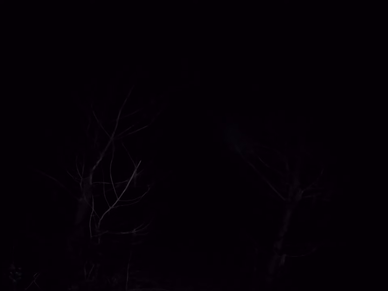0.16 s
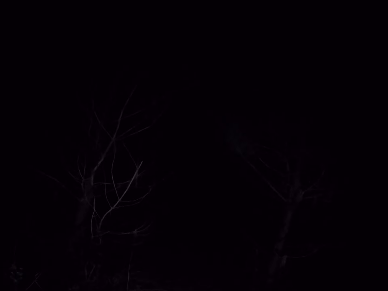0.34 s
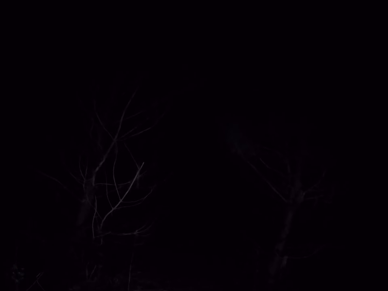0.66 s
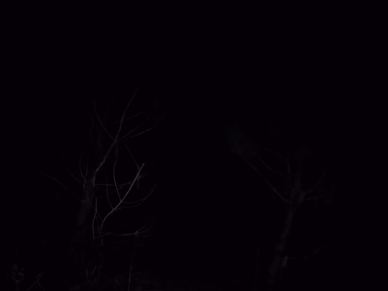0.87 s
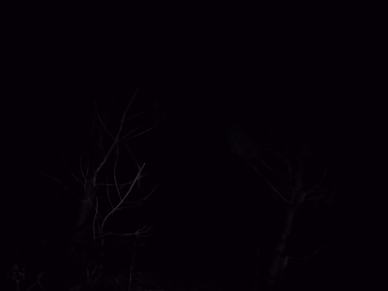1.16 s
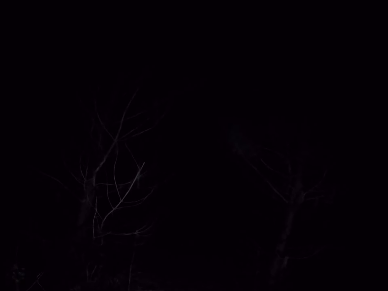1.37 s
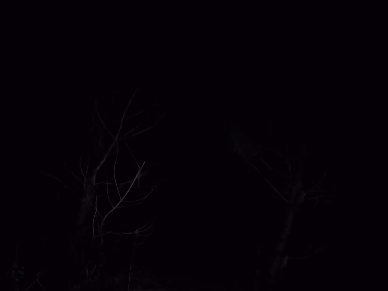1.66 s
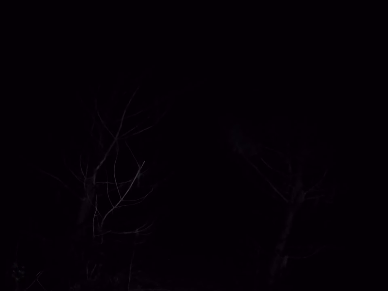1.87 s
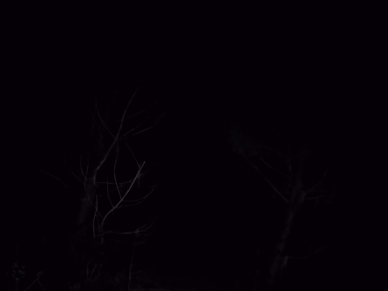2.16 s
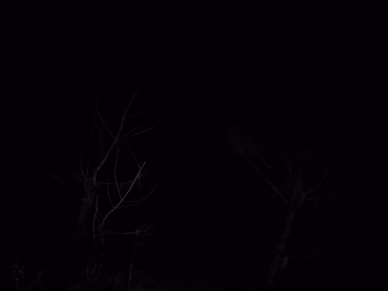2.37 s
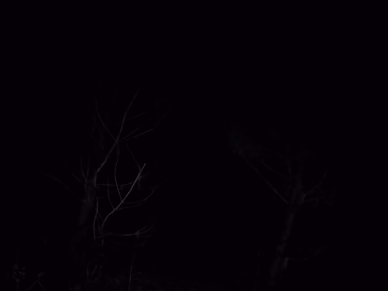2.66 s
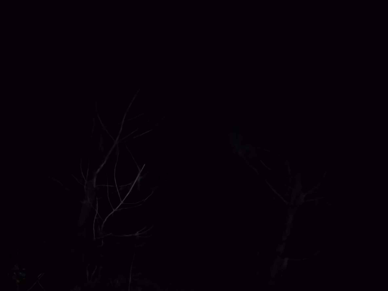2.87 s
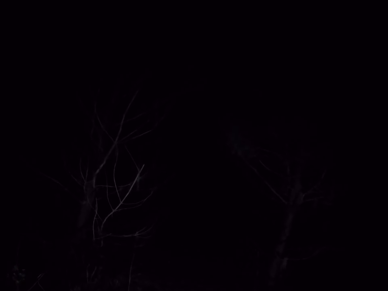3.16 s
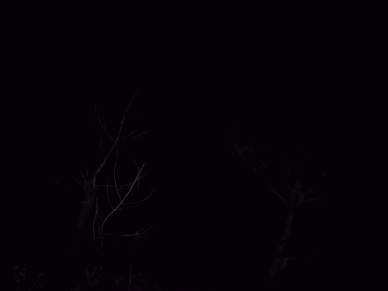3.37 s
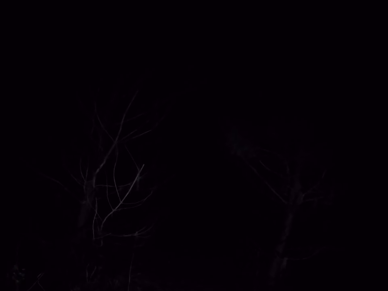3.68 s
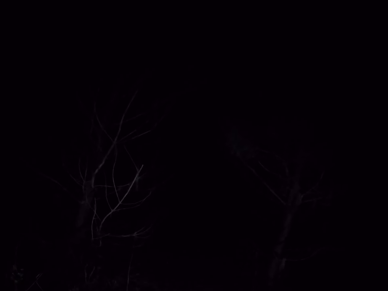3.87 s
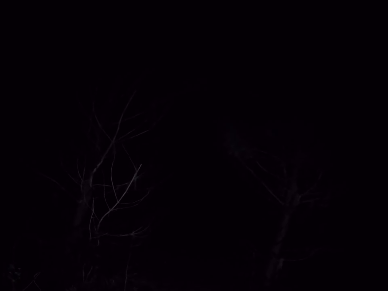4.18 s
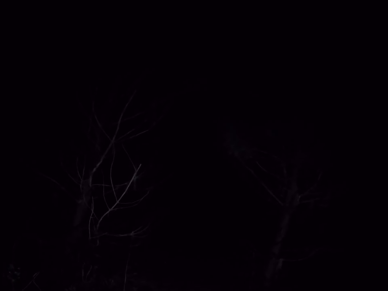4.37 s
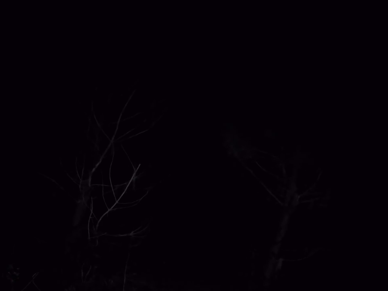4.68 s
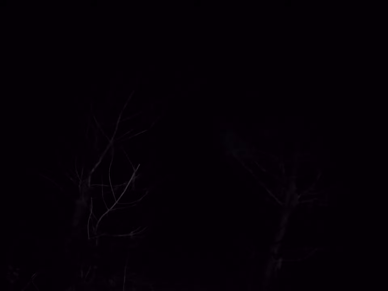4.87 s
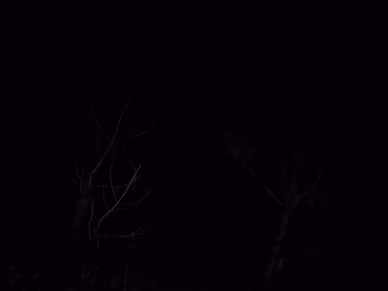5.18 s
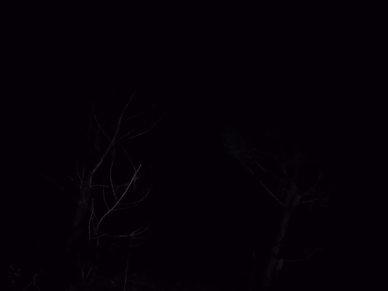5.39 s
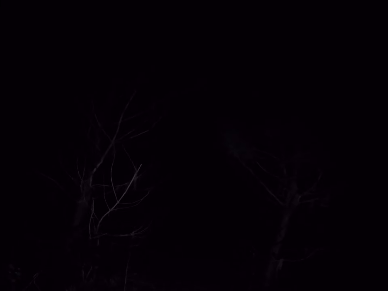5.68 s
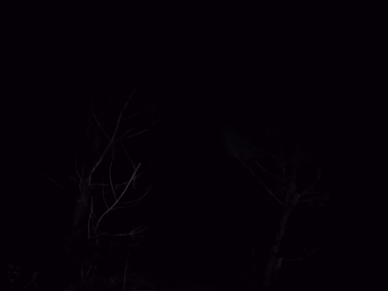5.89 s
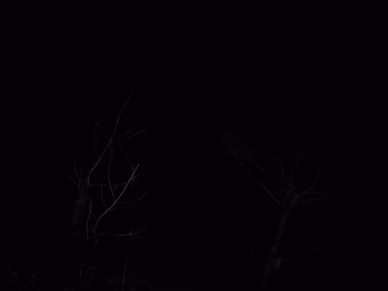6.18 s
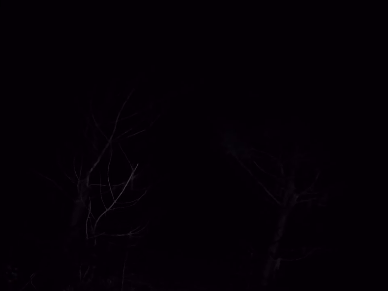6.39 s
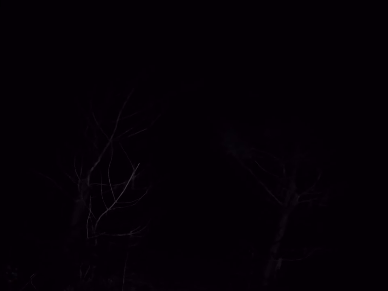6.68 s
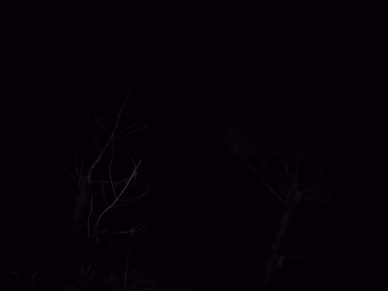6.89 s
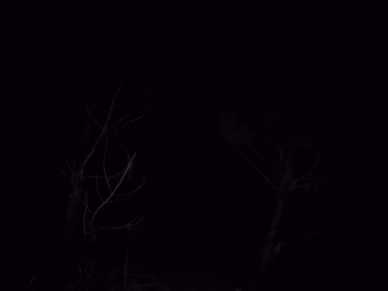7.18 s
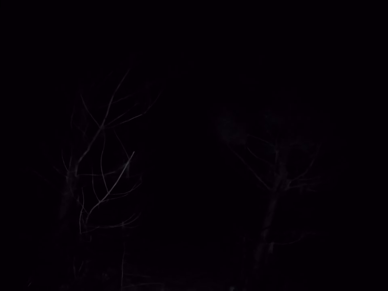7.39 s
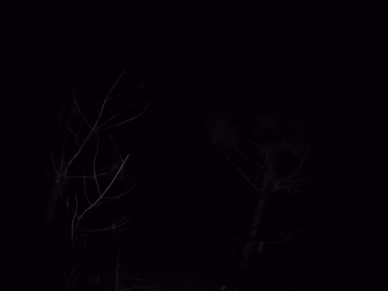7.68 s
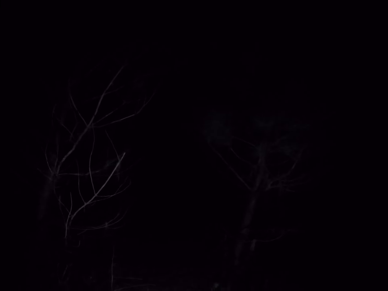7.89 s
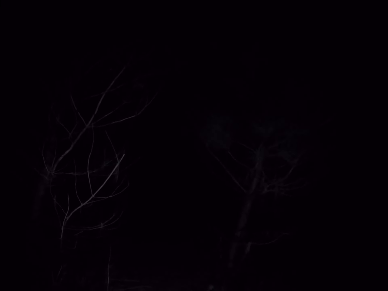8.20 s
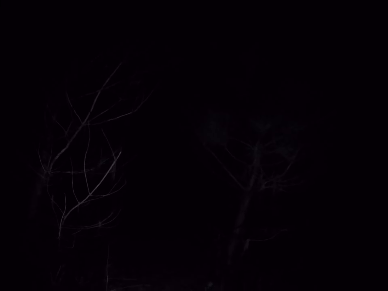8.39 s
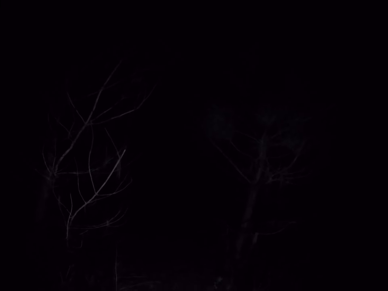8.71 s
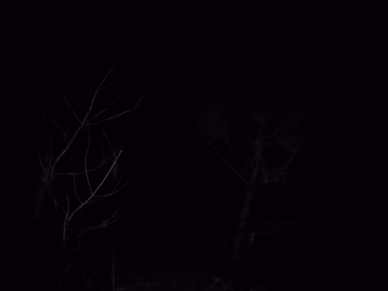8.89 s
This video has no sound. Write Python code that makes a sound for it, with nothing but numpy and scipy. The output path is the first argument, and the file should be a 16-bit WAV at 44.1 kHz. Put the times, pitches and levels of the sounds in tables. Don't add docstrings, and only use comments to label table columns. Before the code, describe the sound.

Night woods full of chirping crickets and rasping katydids, with distant hounds howling, hooting and barking hoarsely in short, echoing bursts.

```python
import sys
import numpy as np
from scipy import signal
from scipy.fft import rfft, irfft, next_fast_len
from scipy.io import wavfile
from scipy.ndimage import uniform_filter1d, map_coordinates

SR = 44100
rng = np.random.default_rng(int(sys.argv[2]) if len(sys.argv) > 2 else 0)


def natural_amplitude(level_db):
    exponent = np.asarray(level_db, float) / 20
    return 10 ** exponent


def transcribe(signal):
    frames = np.atleast_2d(signal).T
    limited = np.clip(frames, -1, 1)
    pcm = np.round(limited * 32767).astype(np.int16)
    wavfile.write(sys.argv[1], SR, pcm)


N = 399105

# first_pulse_s, length_s, level_db
NEAR_CHIRPS = [(0.029, 0.094, -55.5), (0.273, 0.15, -57.5), (0.565, 0.071, -57), (0.918, 0.1, -58.0),
               (1.187, 0.15, -58), (1.533, 0.11, -55), (1.839, 0.13, -56), (2.102, 0.11, -56.5),
               (2.385, 0.11, -56.5), (2.667, 0.15, -57.5), (2.987, 0.12, -60.5), (3.249, 0.16, -56),
               (3.589, 0.094, -56.5), (3.859, 0.11, -58.5), (4.121, 0.14, -58.5), (4.403, 0.16, -59.0),
               (4.71, 0.15, -59.5), (5.059, 0.096, -55.5), (5.362, 0.17, -57.5), (5.667, 0.12, -58),
               (5.952, 0.14, -55.5), (6.241, 0.27, -59.5), (6.599, 0.19, -58), (6.989, 0.16, -57.5),
               (7.372, 0.15, -61.5), (7.771, 0.12, -61.0), (8.639, 0.09, -58)]


def pack():
    # start_s, top_pitch_hz, level_db, scoop_up_share of pitch, brighter_db_per_octave
    howls = [
        (5.73, 614, -37, .17, 0),
    ]
    hoarse_howls = [
        (8.555, 600, -42, .24, 6),
    ]
    leads = [
        (.41, 540, -46.5, .15, 3),
        (7.64, 517, -48, .33, -3),
    ]
    hoots = [
        (.49, 591, -42, .04, -4),
        (7.72, 577, -42, .06, -3),
    ]
    songs = [
        (-.1, 683, -39.5, .01, 3),
        (3.795, 722, -37.5, .14, -6),
        (8.87, 637, -55, .015, 6),
        (3.84, 604, -58, .025, 9),
    ]
    hoarse_songs = [
        (3.17, 680, -36, .015, -2),
        (5.36, 810, -53, .09, 6),
    ]
    facing_songs = [
        (8.59, 705, -38, .02, -1),
    ]
    barks = [
        (.07, 780, -46, .21, -6),
        (2.902, 815, -40, .21, -3),
        (3.608, 820, -39, .21, -1),
        (8.775, 790, -48, .15, -4),
    ]
    yelps = [
        (5.39, 690, -55, .04, 3),
    ]

    # share_of_length, share_of_scoop_left, level_db, tilt_db_per_octave, roughness 0-1
    howl = [
        (0, 1, -26, 4, .08),
        (.15, .48, -14, 5, .11),
        (.28, .13, -7, 5, .09),
        (.44, 0, -3, 1, .04),
        (.6, 0, 0, -10, .03),
        (.82, .05, -3, -14, .04),
        (1, .27, -19, -12, .08),
    ]
    lead = [
        (0, 1, -15, 5, .08),
        (.19, .3, -4, 6, .11),
        (.35, .03, 0, 6, .08),
        (.55, 0, -7, 2, .08),
        (1, 0, -17, 2, .08),
    ]
    song = [
        (0, 1, -12, -8, .12),
        (.15, .55, -1, -4, .1),
        (.3, .05, 0, -3, .06),
        (.6, 0, -3, -5, .06),
        (.85, 0, -9, -2, .08),
        (1, .1, -20, -5, .12),
    ]
    bark = [
        (0, 1, -30, -6, .05),
        (.1, .93, -1, 1, .15),
        (.3, .5, 0, 1, .42),
        (.52, .03, -4, -4, .6),
        (.74, 0, -16, -5, .6),
        (1, 1.2, -16, -11, .75),
    ]

    # frequency_hz, gain_db
    howler_throat = [(350, -8), (580, 0), (1150, -6), (1560, -9), (1800, -18), (2100, -17), (2330, -21),
                     (2620, -12), (2900, -32), (6000, -60)]
    singer_throat = [(340, -45), (480, -16), (680, 0), (1000, -10), (1350, -6), (1600, -9), (1950, -24),
                     (2500, -20), (3200, -30), (5000, -55)]
    facing_throat = [(450, -15), (700, 0), (1400, -11), (2100, -17), (2800, -22), (3500, -30), (4250, -11),
                     (5700, -13), (7100, -26), (8500, -18), (9300, -50)]
    barker_throat = [(330, -42), (520, -12), (800, -6), (990, -4), (1250, -4), (1550, 2), (1900, -6),
                     (2250, -5), (2850, -8), (3500, -22), (5000, -45)]

    # course of the call, (steady, per roughness) half-pitch lines, echo dB
    howler = (howl, (0, .2), -11)
    opener = (lead, (0, .2), -5)
    hooter = (song, (0, 0), -6)
    singer = (song, (0, .74), -5)
    barker = (bark, (1.4, -1.2), -2)

    groups = [  # calls, length in s, throat, roughness over the usual, style
        (howls, .245, howler_throat, 1, howler),
        (hoarse_howls, .245, howler_throat, 2.6, howler),
        (leads, .17, howler_throat, 1, opener),
        (hoots, .16, howler_throat, .8, hooter),
        (songs, .2, singer_throat, 1.3, singer),
        (hoarse_songs, .2, singer_throat, 4.5, singer),
        (facing_songs, .2, facing_throat, 1.1, singer),
        (barks, .17, barker_throat, 1, barker),
        (yelps, .12, barker_throat, .4, barker)]
    track = np.zeros(N)
    for calls, length, throat, strain, (shape, half, wet_db) in groups:
        for call in calls:
            cry = voice(shaped(call, length, shape, strain, half), throat)
            add(track, call[0], woods(cry, wet_db))
    return track


def shaped(call, length, shape, strain, half):
    s, hz, db, scoop, bright = call
    rows = []
    for u, left, push, tilt, rough in shape:
        rough = strain * rough
        pitch = hz * (1 - scoop * left)
        rows.append((s + u * length, pitch, db + push, tilt + bright, rough, half[0] + half[1] * rough))
    return rows


def voice(rows, throat):
    t = np.arange(round(rows[0][0] * SR), round((rows[-1][0] + 0.012) * SR)) / SR
    since = t - t[0]
    hz, db, tilt, rough, half = curves(rows, t)
    rough = np.clip(rough, 0, 1)
    hz = hz * (1 + 0.0788 * rough * wobble(260, len(t)))
    k = np.arange(1, 29)[:, None] / 2
    half_lines = np.where(k % 1, np.clip(half, 0, 2), 1)
    weight = natural_amplitude(along(throat, k * hz) + tilt * np.log2(k)) * half_lines

    swirl = map_coordinates(rng.standard_normal((30, 160)), np.broadcast_arrays(2 * k, since * 300), order=1)
    breakup = 2.8 * rough * np.clip(k - 1, 0, 1.5) * swirl
    flicker = map_coordinates(rng.standard_normal((30, 20)), np.broadcast_arrays(2 * k, since * 30), order=1)
    shimmer = natural_amplitude(3.5 * np.clip(k - 1, 0, 1) * flicker)

    phase = 2 * np.pi * k * np.cumsum(hz) / SR + k * k + breakup
    tone = np.sum(weight * shimmer * np.cos(phase), axis=0)
    tone = tone / np.sqrt(np.sum(weight ** 2, axis=0) / 2)
    size = natural_amplitude(5 * rough * wobble(200, len(t)))
    fade_in = since + (t[0] <= 0)
    ends = np.clip(np.minimum(fade_in, t[-1] - t) / 0.0078, 0, 1)
    return natural_amplitude(db) * ends * size * tone


def woods(x, wet_db, scale=1):
    # frequency_hz, t60_s
    decay = [(300, 0.75), (700, 0.69), (1500, 0.78), (3000, 0.43), (8000, 0.1)]
    hz, t, z = signal.stft(rng.standard_normal(SR), SR, nperseg=256)
    t60 = scale * along(decay, hz)[:, None]
    tail = signal.istft(z * natural_amplitude(-60 * t / t60), SR, nperseg=256)[1]
    tail = tail * (1 - np.exp(-np.arange(len(tail)) / (0.004 * SR)))
    wet = natural_amplitude(wet_db) * signal.fftconvolve(x, tail / np.linalg.norm(tail))
    return wet + np.pad(x, (0, len(wet) - len(x)))


def crickets():
    # first_s, last_s, period_s, level_db
    tick_runs = [
        (.018, .9, .138, -72),
        (1.25, 2.05, .146, -73),
        (2.46, 3.9, .135, -73),
        (3.98, 6.7, .1398, -72),
        (6.783, 9.03, .1223, -71),
    ]
    # time_s, level_db
    trill_level = [(0.0, -61), (0.78, -68), (2.65, -65), (2.97, -60), (3.73, -77), (4.91, -58),
                   (6.13, -55.5), (7.21, -58), (7.49, -63), (7.99, -61.5), (9.05, -62)]
    # time_s, pulses_per_s
    trill_pace = [(0, 41.5), (3, 42.5), (4.6, 44), (5.6, 43.3), (6.4, 42.2), (9.05, 41.9)]
    side, low = answers()
    near = chirper(NEAR_CHIRPS, 6610, 9.2) + chirper(side, 6230, 1.1)
    near = near + chirper(low, 5950, -1.5)
    for first, last, period, db in tick_runs:
        times = np.arange(first, last, period)
        near = near + strokes(times, db + 7.5 + 0 * times, 7680, length=.024, fall=.005, slip=3)

    t = np.arange(N) / SR
    db, = curves(trill_level, t)
    pace, = curves(trill_pace, t)
    at = np.flatnonzero(np.diff(np.floor(np.cumsum(pace) / SR)))
    trill = strokes(at / SR, db[at] + 7.5, 3386, length=.018, fall=0.12, slip=1.0)
    return woods(near + trill, -8, scale=.6)[:N]


def answers():
    # first_pulse_s, length_s, level_db
    own_chirps = [(6.069, .25, -58), (6.526, .171, -57), (6.835, .061, -56), (7.098, .11, -56),
                  (7.486, .18, -59), (7.943, .089, -57), (8.435, .048, -53), (8.665, .05, -64),
                  (8.924, .13, -56)]
    luck = rng.standard_normal((len(NEAR_CHIRPS), 2))
    spread_db = 3
    side, low = [], []
    for (s, *_), (a, b) in zip(NEAR_CHIRPS, luck):
        if s < 7.6:
            side.append((s + .02, .11, -59 + spread_db * a))
        if s < 5.8:
            low.append((s + .045, .08, -69 + 1.5 * s + spread_db * b))
    return side, low + own_chirps


def chirper(chirps, hz, gain_db):
    rows = []
    for s, length, db in chirps:
        for u in np.arange(-.03, length + .06, .03):
            rows.append((s + u, db - 5 * (2 * u / length - .9) ** 2))
    times, dbs = np.transpose(rows)
    return strokes(times, dbs + gain_db, hz, length=0.033, fall=0.007, slip=1.14)


def strokes(times, dbs, hz, length, fall, slip):
    track = np.zeros(N)
    t = np.linspace(-.5, .5, round(length * SR))
    shape = np.sin(np.pi * (t + .5) ** 1.6) ** 2
    for s, db, (size, tune, turn) in zip(times, dbs, rng.standard_normal((600, 3))):
        cycles = hz * (1 + 0.0035 * tune) * length * (t - fall * t * t / 2)
        tone = np.sin(2 * np.pi * cycles + slip * turn)
        add(track, s - .6 * length, natural_amplitude(db + 0.88 * size) * shape * tone)
    return track


def katydid():
    # start_s, peak_db, wing_hz
    rasps = [(0.992, -53.5, 10800), (1.7749, -62, 10600), (2.5411, -60, 9430), (3.0235, -54, 10900),
             (3.9325, -51.5, 10740), (5.541, -53.5, 10900), (6.5216, -53, 10580), (7.499, -59, 11570),
             (8.1094, -47.5, 10900)]
    track = np.zeros(N)
    t = np.arange(round(.09 * SR)) / SR
    shape = np.interp(t, [0, .004, .013, .017, .03, .04, .062, .09], [0, .7, 1, .1, .1, 1, .8, 0])
    for s, db, hz in rasps:
        teeth = (1 + 0.57 * np.cos(2 * np.pi * 330 * t)) * rng.standard_normal(len(t))
        wing = signal.butter(2, [hz - 700, hz + 1100], "bandpass", fs=SR, output="sos")
        add(track, s, natural_amplitude(db - 13) * shape * unit(signal.sosfilt(wing, teeth)))
    return track


def bumps():
    # start_s, peak_db, pitch_hz
    thuds = [(0.218, -63, 94.2), (0.832, -54.5, 123), (1.282, -51, 120.3), (3.07, -50.5, 183),
             (3.346, -48, 140), (4.789, -53, 277), (5.463, -47.5, 234), (8.129, -56, 252),
             (8.751, -45.5, 125.4)]
    track = np.zeros(N)
    t = np.arange(SR // 8) / SR
    for s, db, hz in thuds:
        swell = natural_amplitude(db + 5 - 60 * t / 0.11) * (1 - np.exp(-t / 0.0075))
        add(track, s, swell * np.sin(2 * np.pi * hz * (1.15 * t - 4 * t * t)))
    return track


def leaf():
    # time_s, level_db, half_length_s, low_hz, high_hz
    puff = (8.135, -62, .025, 400, 1600)
    s, db, half, low_hz, high_hz = puff
    shape = np.exp(-((np.arange(N) / SR - s) / half) ** 2)
    return natural_amplitude(db) * shape * noise(coloured([(low_hz, 0), (high_hz, -3)]), patchy_db=1.5)


def snaps():
    # start_s, peak_db
    ticks = [(1.202, -58), (1.3857, -57), (2.2543, -55), (2.3491, -56), (2.4887, -58), (4.2174, -59),
             (5.249, -57), (5.4476, -55), (6.7212, -53), (6.8194, -54), (7.6395, -54), (8.3794, -57)]
    track = np.zeros(N)
    t = np.arange(SR // 200) / SR
    for s, db in ticks:
        add(track, s, natural_amplitude(db + 1.0 - 60 * t / .005) * rng.standard_normal(len(t)))
    return signal.sosfilt(signal.butter(4, 9800, "highpass", fs=SR, output="sos"), track)


def chorus():
    # centre_hz, width_hz, level_db
    bands = [(2183, 110, -70), (3403, 284, -64), (3666, 265, -64.5), (4740, 500, -73.5), (6200, 470, -66),
             (6550, 300, -65.5), (6920, 730, -63.5), (7530, 340, -77.5)]
    # frequency_hz, level_db_per_hz
    low_choir = [(1500, -21), (2000, -4.5), (2900, -2), (4000, -8), (4800, -8), (5600, -11), (6500, -45)]
    high_choir = [(9500, -12), (11500, -2), (13500, 1), (15200, 3)]
    low_gain, high_gain = swells()
    track = natural_amplitude(3) * low_gain * noise(coloured(low_choir), patchy_db=1.5)
    track += natural_amplitude(-5.5) * high_gain * noise(coloured(high_choir), patchy_db=1.2)
    for centre_hz, width_hz, db in bands:
        band = narrow(centre_hz, width_hz)
        track += natural_amplitude(db + 1.5 * wobble(2.944) + 1.02 * wobble(70)) * band
    return track


def swells():
    # peak_s, level_db
    waves = [(0, -61), (1.1, -65), (1.97, -65), (2.9, -63), (3.82, -62), (4.65, -64.5), (5.52, -63.5),
             (6.4, -65), (7.6, -64), (8.55, -63)]
    # start_s, length_s, level_db
    bouts = [
        (1.05, .15, -68),
        (1.93, .27, -67),
        (2.52, .3, -71),
        (4.7, .45, -70),
        (6.9, .3, -70),
        (8.5, .28, -67),
    ]
    t = np.arange(N) / SR
    low = natural_amplitude(-68) + sum(natural_amplitude(db) * np.exp(-((t - s) / .25) ** 2) for s, db in waves)

    def gate(u):
        return (1 + np.tanh(u / .025)) / 2

    high = natural_amplitude(-75) + sum(natural_amplitude(db) * gate(t - s) * gate(s + length - t) for s, length, db in bouts)
    return low, high


def air():
    # frequency_hz, level_db_per_hz
    rumble = [(12, -30), (20, 0), (43, -1), (81, -13), (219, -17.5), (245, -18.5), (615, -23.5),
              (1120, -26), (1800, -28), (2340, -35), (3960, -120)]
    hiss = [(1200, -3), (2000, -0.5), (5500, -7.5), (8300, -5.5), (15300, -10)]
    low = natural_amplitude(-57.5) * noise(coloured(rumble), patchy_db=1.03)
    return low + natural_amplitude(-68) * noise(coloured(hiss), patchy_db=1.2)


def noise(gain, patchy_db):
    hz, _, z = signal.stft(rng.standard_normal(N + 1024), SR, nperseg=1024)
    field = uniform_filter1d(uniform_filter1d(rng.standard_normal(z.shape), 8, 0), 6, 1)
    z = z * gain(hz)[:, None] * natural_amplitude(patchy_db * unit(field))
    return unit(signal.istft(z, SR, nperseg=1024)[1][:N])


def narrow(centre_hz, width_hz):
    size = next_fast_len(N)
    hz = np.fft.rfftfreq(size, 1 / SR)
    bell = np.exp(-2 * ((hz - centre_hz) / width_hz) ** 2)
    return unit(irfft(rfft(rng.standard_normal(size)) * bell, size)[:N])


def coloured(points):
    return lambda hz: natural_amplitude(along(points, hz)) * (hz > .8 * points[0][0]) * (hz < 1.1 * points[-1][0])


def wobble(rate, size=N):
    knots = rng.standard_normal(int(N * 400 / SR))
    return map_coordinates(knots, [np.arange(size) * rate / SR], order=2)


def along(points, hz):
    f, v = np.transpose(points)
    return np.interp(np.log(hz + 1), np.log(f + 1), v)


def curves(rows, t):
    s, *cols = np.transpose(rows)
    return [np.interp(t, s, c) for c in cols]


def unit(x):
    return x / np.sqrt(np.mean(x ** 2) + 1e-20)


def add(track, s, x):
    at = round(s * SR)
    part = track[max(at, 0):][:len(x) + min(at, 0)]
    part += x[max(-at, 0):][:len(part)]


def scene():
    hounds = pack()
    insects = crickets() + katydid() + chorus()
    handling = bumps() + leaf() + snaps()
    return (hounds + insects + handling + air())[None]


def roll_off(x):
    return signal.sosfilt(signal.butter(12, 15260, fs=SR, output="sos"), x)


def record(dry):
    return roll_off(dry)


dry = scene()
out = record(dry)
transcribe(out)
```